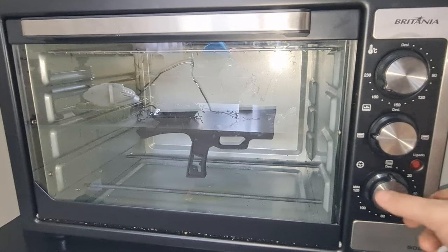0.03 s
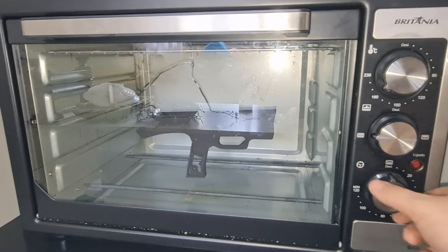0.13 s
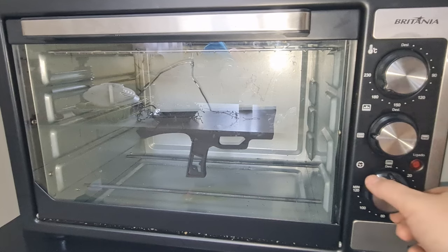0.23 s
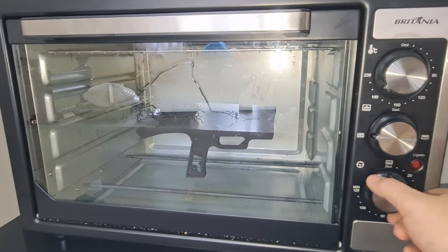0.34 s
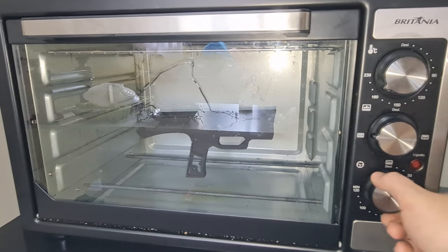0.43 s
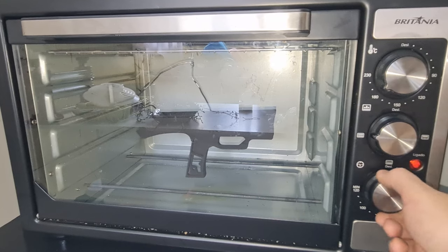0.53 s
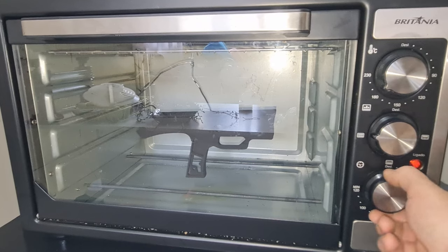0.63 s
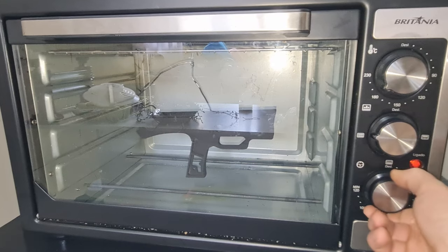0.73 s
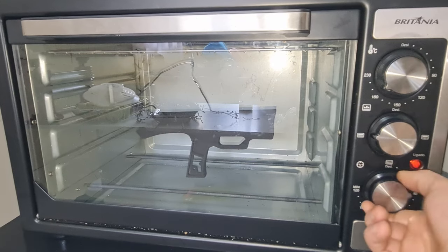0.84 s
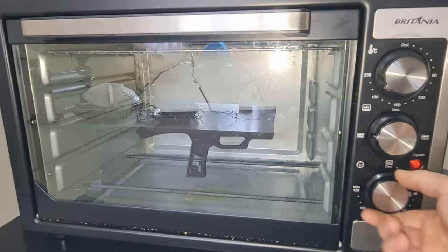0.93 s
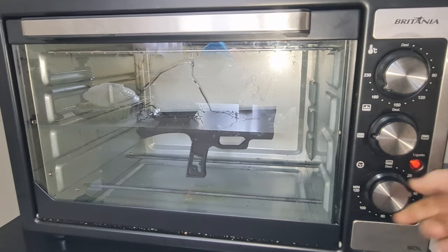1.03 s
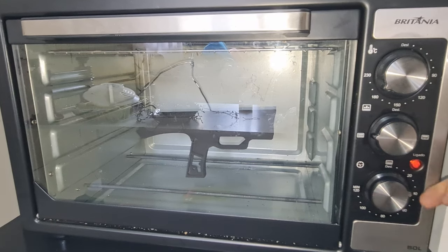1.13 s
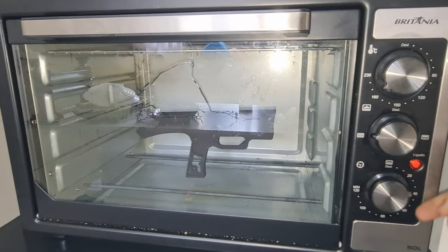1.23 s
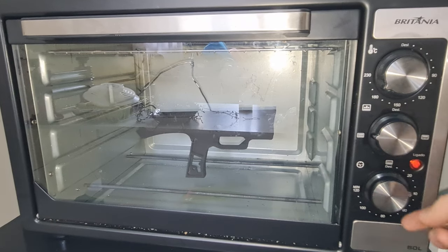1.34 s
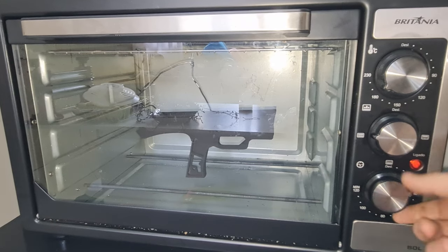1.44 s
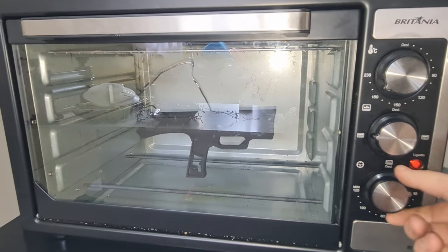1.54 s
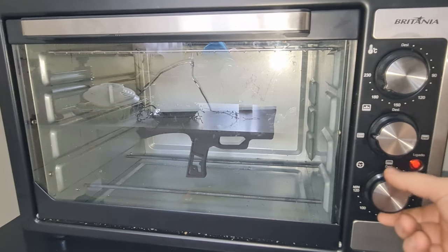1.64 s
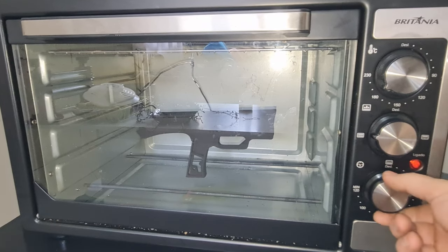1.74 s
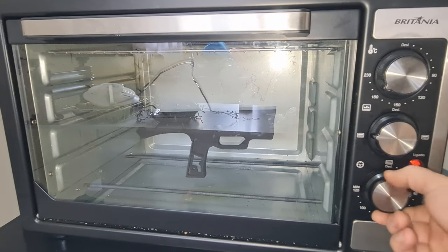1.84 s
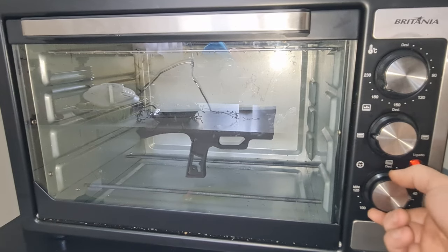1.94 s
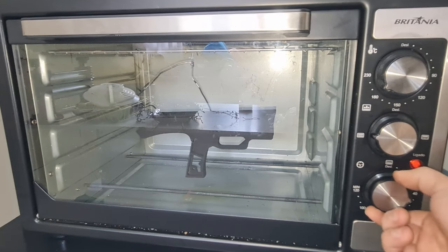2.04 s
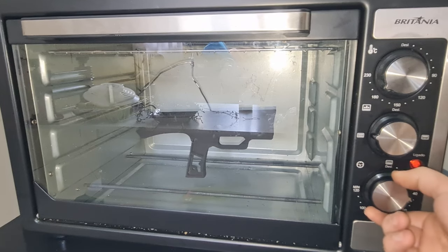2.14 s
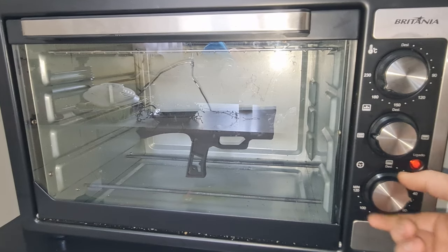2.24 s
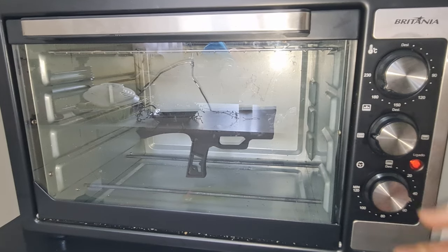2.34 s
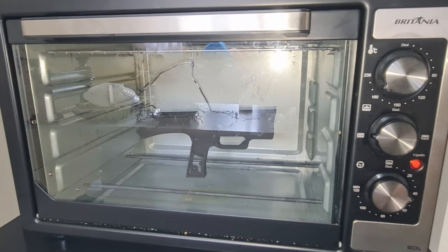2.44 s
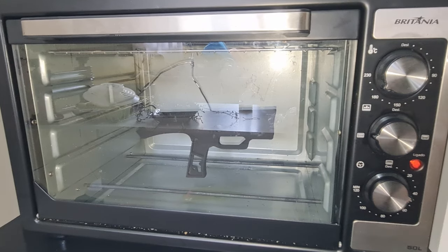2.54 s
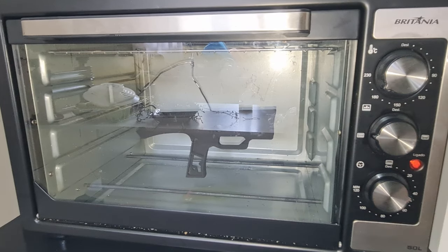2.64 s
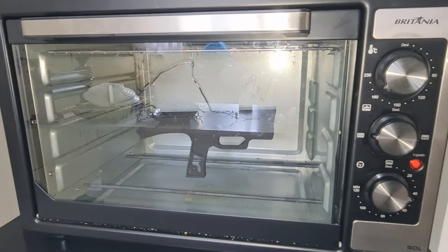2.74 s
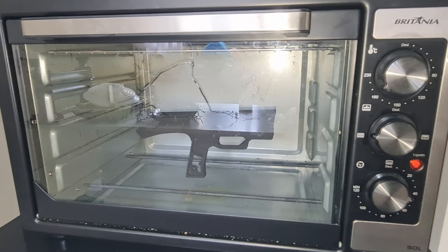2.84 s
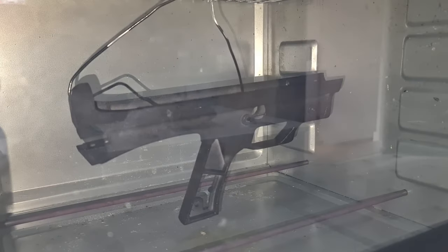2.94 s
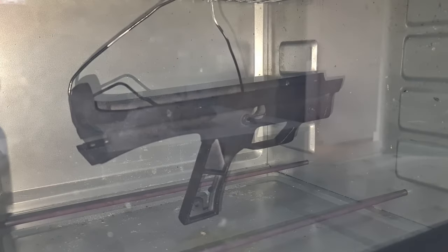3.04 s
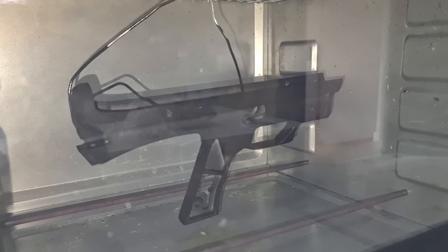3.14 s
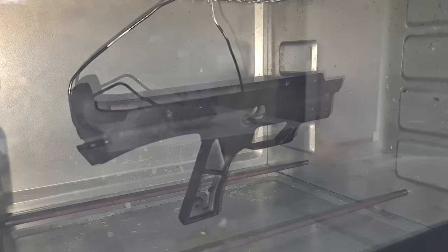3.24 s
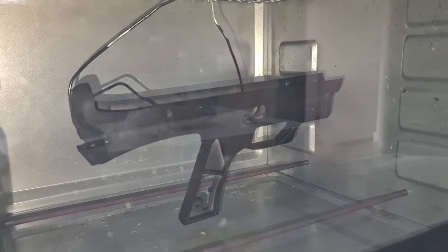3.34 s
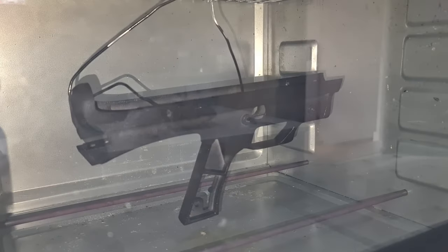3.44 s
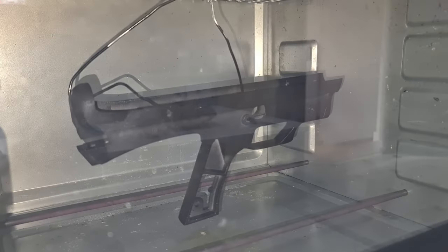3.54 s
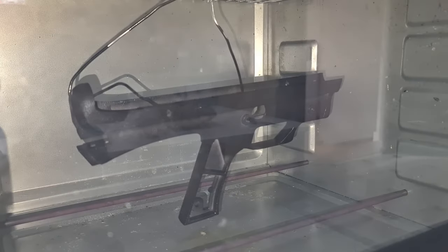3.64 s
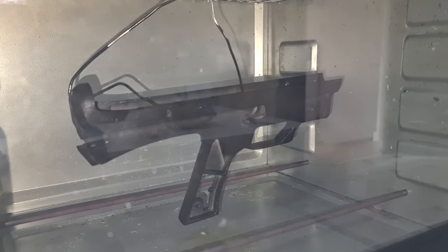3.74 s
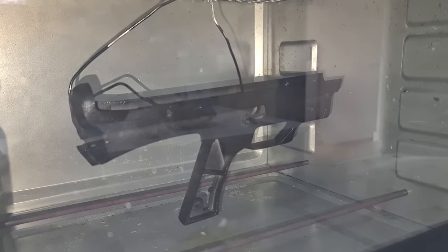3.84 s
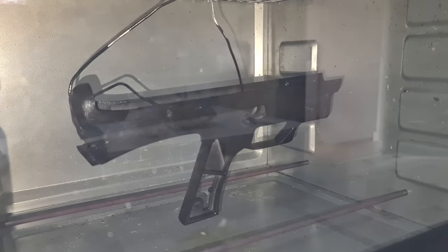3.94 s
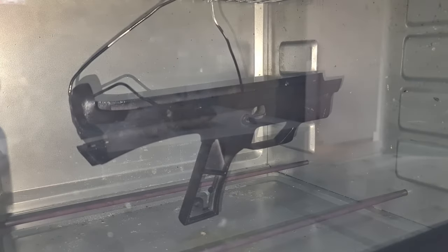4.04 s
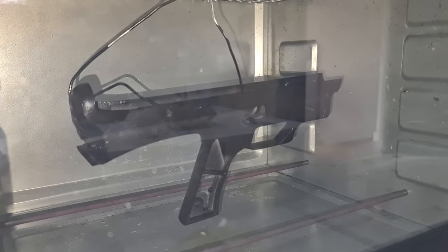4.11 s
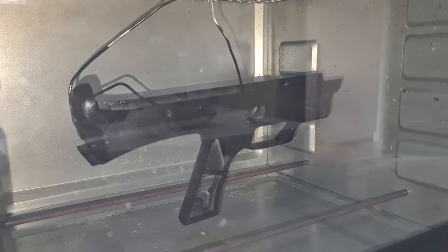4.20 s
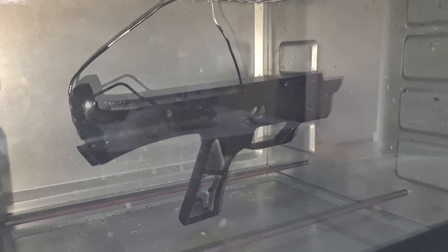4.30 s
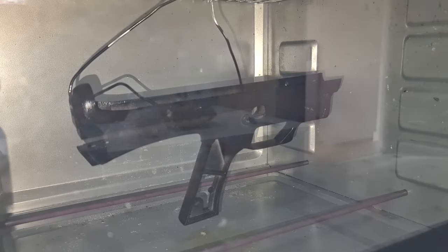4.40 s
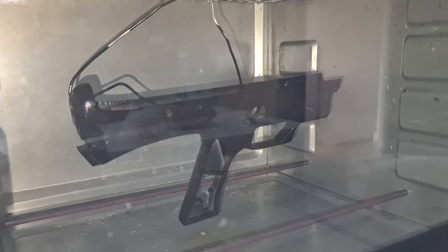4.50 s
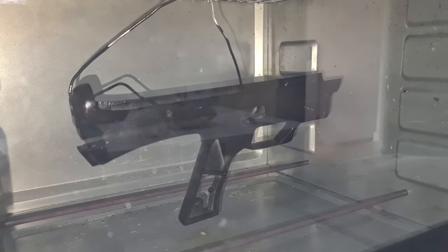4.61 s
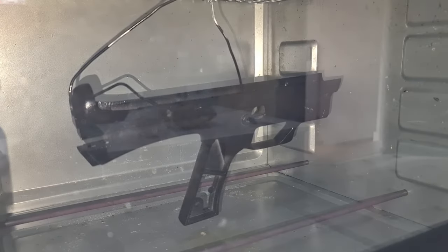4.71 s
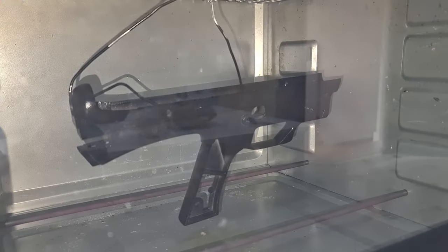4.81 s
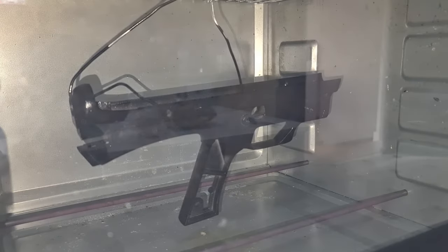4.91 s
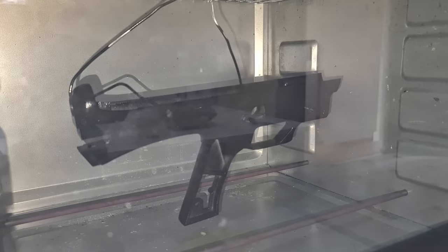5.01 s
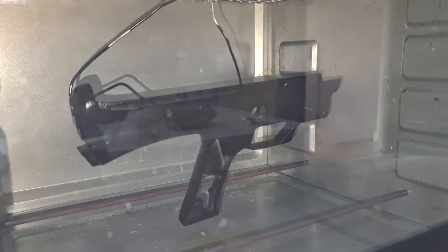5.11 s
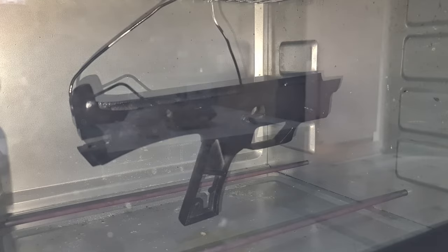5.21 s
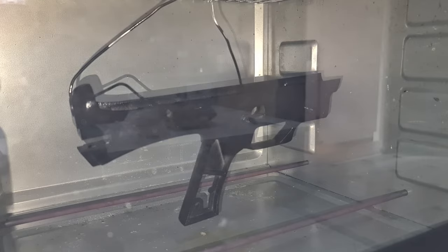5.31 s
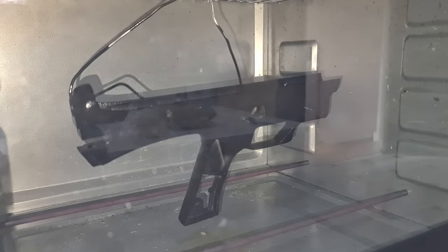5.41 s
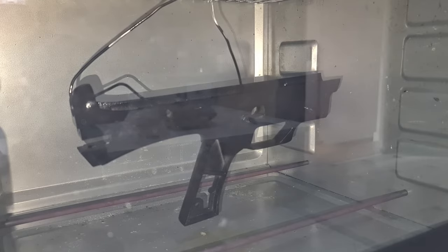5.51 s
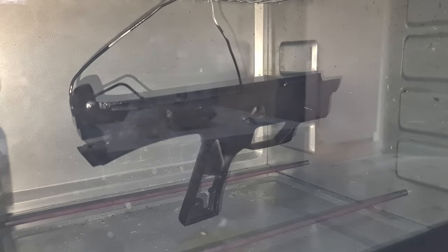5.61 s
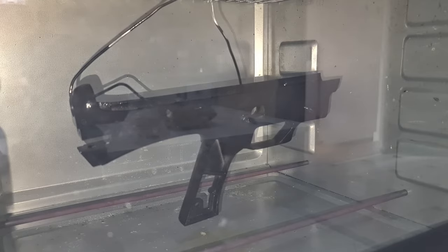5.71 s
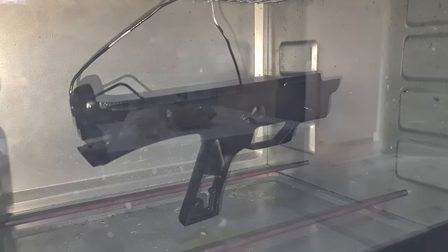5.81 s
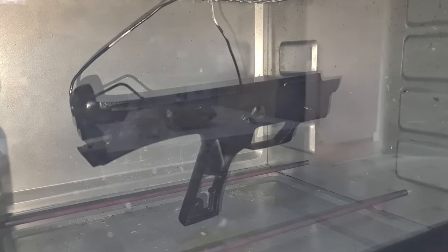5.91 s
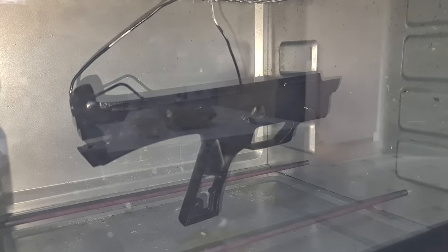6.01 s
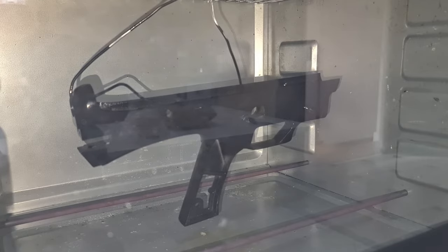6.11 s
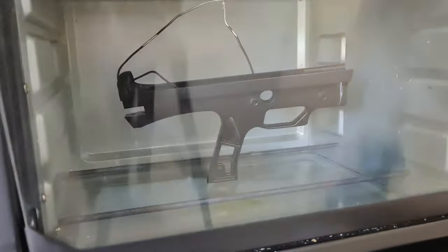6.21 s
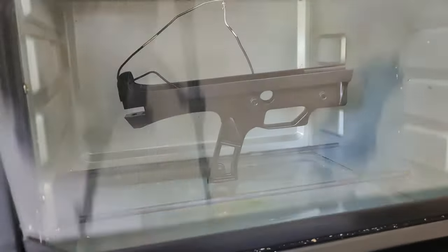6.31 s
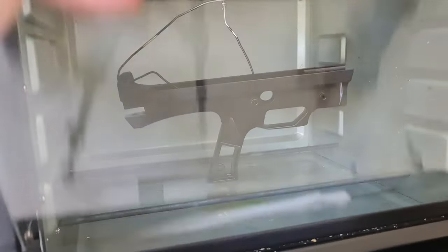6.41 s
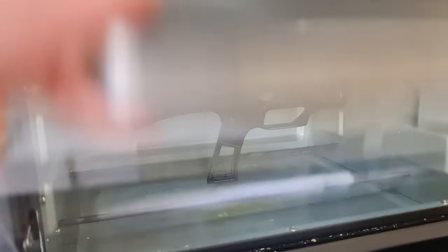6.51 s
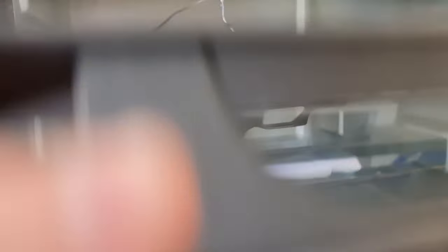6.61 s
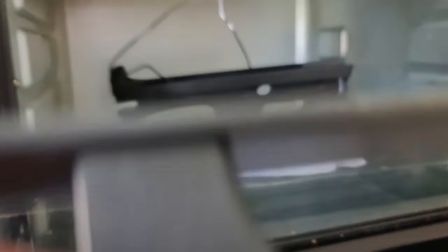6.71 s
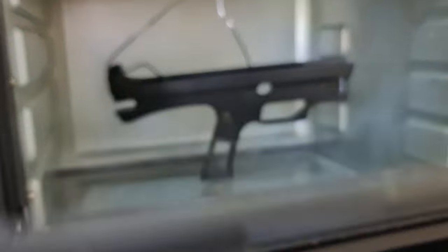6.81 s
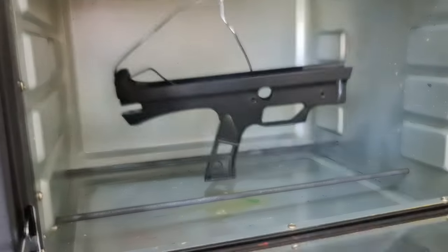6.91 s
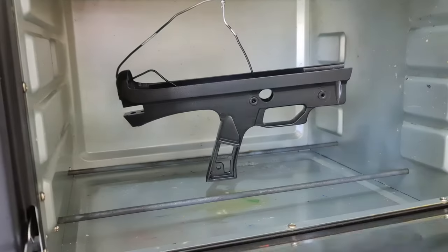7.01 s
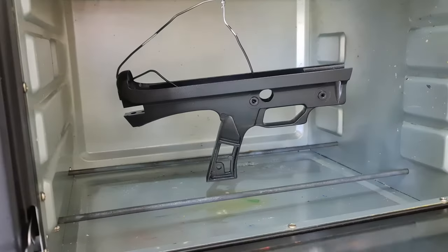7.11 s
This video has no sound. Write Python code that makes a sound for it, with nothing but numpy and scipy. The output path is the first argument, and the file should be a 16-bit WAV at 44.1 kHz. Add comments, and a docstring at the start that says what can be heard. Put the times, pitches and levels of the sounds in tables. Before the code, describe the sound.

A clockwork oven timer knob ratchets and clicks over a low drone, birds yelp outdoors, then a glass oven door squeals and knocks on its hinge.

```python
"""First a low wavering drone and rumble, with a bird yelping outdoors; both low sounds stop near 3 s.
In a small hard room an oven's clockwork timer knob is wound up and turned back: ticking gears, small clicks.
Two birds call on, in gliding harmonics and breath noise. Then a mains hum enters and the glass door swings on
its spring hinge: impulses knock, grains rattle and scrape, gliding tones squeal, and all ring glass and frame.
Still air and faint hiss, made of filtered noise, lie under everything."""
import sys
import numpy as np
from scipy import signal
from scipy.fft import rfft, irfft
from scipy.io import wavfile
from scipy.ndimage import uniform_filter1d

SR = 44100
rng = np.random.default_rng(int(sys.argv[2]) if len(sys.argv) > 2 else 0)


def log_audio(samples):
    """Write samples as a 16-bit WAV file to the path given in sys.argv[1]."""
    # one column per channel
    frames = np.atleast_2d(samples).T
    # limit to full scale, then quantise
    limited = np.clip(frames, -1, 1)
    pcm = np.round(limited * 32767).astype(np.int16)
    wavfile.write(sys.argv[1], SR, pcm)


N = 315315
TIME = np.arange(N) / SR
EDGE_HZ = 15750  # upper edge of the whole sound


def amp(db):
    """Decibels to gain."""
    return 10 ** (np.asarray(db) / 20)


def evened(x):
    """Scales to rms 1."""
    return x / np.sqrt(np.mean(x ** 2) + 1e-20)


def unit(x):
    """Scales each channel to energy 1."""
    return x / np.linalg.norm(x, axis=-1, keepdims=True)


def read(points, hz):
    """Reads a spectrum on a log-frequency axis."""
    f, value = np.transpose(points)
    return np.interp(np.log(hz + 1), np.log(f + 1), value)


def level(rows, axis=1):
    """A dB column as a gain over time, silent outside its span."""
    rows = np.array(rows)
    return amp(np.interp(TIME, rows[:, 0], rows[:, axis], left=-150, right=-150))


def ramp(start, rise_s):
    """Rises from 0 to 1 after start."""
    return np.clip((TIME - start) / rise_s, 0, 1)


def since(start):
    """Seconds gone by after start."""
    return np.maximum(TIME - start, 0)


def drift(cutoff_hz, size=N):
    """Smooth random wandering of rms 1: noise with its fast changes filtered off."""
    spectrum = rfft(rng.standard_normal(size))
    lowpass = 1 + (np.fft.rfftfreq(size, 1 / SR) / cutoff_hz) ** 4
    return evened(irfft(spectrum / lowpass, size))


def through(x, response):
    """Plays x through an impulse response."""
    return signal.oaconvolve(np.atleast_2d(x), np.atleast_2d(response), axes=1)[:, :N]


def colour(x, spectrum):
    """Causal (minimum-phase) filter with the given spectrum."""
    hz = abs(np.fft.fftfreq(4096, 1 / SR))
    log_gain = np.log(amp(np.maximum(read(spectrum, hz), -100)))
    response = np.fft.ifft(np.exp(np.conj(signal.hilbert(log_gain)))).real
    return through(x, response)


# How alike the two microphones hear diffuse sound.
# Each row: frequency in Hz, left-right likeness from -1 to 1.
LIKENESS = [(60, 0.91), (200, 0.81), (600, 0.63), (1300, 0.35), (3000, -0.14), (10000, 0.32)]


def diffuse(size):
    """Noise at two microphones: alike in the bass, largely unrelated in the treble."""
    a, b = rfft(rng.standard_normal((2, size)))
    alike = np.clip(read(LIKENESS, np.fft.rfftfreq(size, 1 / SR)), -1, 1)
    mid = a * np.sqrt((1 + alike) / 2)
    side = b * np.sqrt((1 - alike) / 2)
    return irfft(np.array([mid + side, mid - side]), size)


def burst(ring_s):
    """The dense, short ring of a small part, even in colour; ring_s sets how slowly it dies."""
    decay = amp(-60 * TIME[:4096] / ring_s)
    z = rfft(diffuse(size=4096) * decay)
    even = z / np.sqrt(uniform_filter1d(abs(z) ** 2, size=5) + 1e-12)
    return unit(irfft(even) * np.sqrt(decay))


def ringing(x, modes, ring_db):
    """Adds the ring of an object's modes, heard in another phase at each microphone."""
    t = TIME[:SR]
    ring = 0
    for hz, db, t60 in modes:
        phase = rng.uniform(-0.43, 1, (2, 1)) * min(hz / 700, np.pi)
        ring = ring + amp(db) * unit(amp(-60 * t / t60) * np.sin(2 * np.pi * hz * t + phase))
    return x + amp(ring_db) * through(x, unit(ring))


# How long the small hard room rings.
# Each row: frequency in Hz, t60 in seconds before any stretch.
ROOM_DECAY = [(100, 1), (500, 0.41), (2000, 0.5), (5000, 0.41), (10000, 0.38), (16000, 0.27)]


def room(x, wet_db, longer=1):
    """Adds a diffuse tail in which each band dies at its own speed; longer stretches it."""
    hz, t, z = signal.stft(diffuse(size=2 * SR), SR, nperseg=256)
    decay = amp(-60 * t / (longer * read(ROOM_DECAY, hz)[:, None]))
    tail = signal.istft(z * decay, SR, nperseg=256)[1]
    tail *= np.clip(TIME[:tail.shape[1]] / 0.0031, 0, 1)
    return (x + amp(wet_db) * through(x, unit(tail))) / np.sqrt(1 + amp(wet_db) ** 2)


def grains(per_s, spread_db):
    """A random train of tiny impacts of uneven size."""
    size = amp(spread_db * np.minimum(rng.exponential(1, N), 3)) * rng.choice([-1, 1], N)
    return evened(size * (rng.random(N) < per_s / SR))


def blows(rows, axis=1):
    """One impulse for each row of an event table."""
    rows, train = np.array(rows), np.zeros(N)
    train[np.round(rows[:, 0] * SR).astype(int)] = amp(rows[:, axis])
    return train


# The low drone's path. Each row: time in seconds, centre pitch in Hz, relative level in dB.
DRONE_PATH = [(0.0, 62.4, -52), (0.45, 62.75, -52), (0.54, 57.24, -69), (1.32, 73.4, -47.5),
              (1.77, 73.3, -47.5), (1.98, 57.46, -67), (2.16, 55.7, -61.5), (2.58, 71.1, -63),
              (2.76, 60.3, -70), (3.02, 56.6, -70)]
# Colour of the rumble. Each row: frequency in Hz, relative level in dB.
RUMBLE_COLOUR = [(15, -16), (35, -7), (55, 4.5), (85, -3.5), (130, -13), (230, -15), (275, -12.5),
                 (330, -21), (700, -30), (1500, -38), (4000, -40), (12000, -54), (14000, -92)]
# Mains hum. Each row: frequency in Hz, relative level in dB.
HUM_TONES = [(59.2, -48.5), (118.4, -57.5), (393, -67.5)]
# Colour of the still air. Each row: frequency in Hz, relative level in dB.
AIR_COLOUR = [(15, -3), (35, -0.5), (100, -2.5), (200, -13.5), (500, -19.5), (950, -24), (1450, -25),
              (1800, -30.5), (3000, -29.5), (9000, -48), (12000, -70)]
# Colour of the microphone hiss. Each row: frequency in Hz, relative level in dB.
HISS_COLOUR = [(3900, -28), (4550, -2), (5150, -5), (5600, 0), (5950, -24), (6650, -25), (7200, -10),
               (8100, -5), (8750, -12), (9400, -36), (11000, -65)]
DRONE_DB, RUMBLE_DB, RUMBLE_UNTIL_S = -0.5, -58, 3.03


def background(hum_from=6.19):
    """A wavering drone in low rumble, then mains hum; still air and thin microphone hiss throughout."""
    s, path_hz, _ = np.transpose(DRONE_PATH)
    drone_hz = np.interp(TIME, s, path_hz) * (1 + 0.009 * drift(9.3))
    phase = 2 * np.pi * np.cumsum(drone_hz) / SR
    drone = np.sqrt(2) * np.sin(phase) * level(DRONE_PATH, axis=2) * amp(DRONE_DB + 4.2 * drift(12))
    rumble = evened(colour(diffuse(N), RUMBLE_COLOUR)) * amp(RUMBLE_DB) * (1 - ramp(RUMBLE_UNTIL_S, .02))
    tones = sum(amp(db) * np.sin(2 * np.pi * hz * TIME) for hz, db in HUM_TONES)
    hum = np.sqrt(2) * tones * ramp(hum_from, 0.0041)
    air = amp(-69) * evened(colour(diffuse(N), AIR_COLOUR)) * amp(0.3 * drift(1.8))
    hiss = evened(colour(rng.standard_normal((2, N)), HISS_COLOUR)) * amp([[-73.3], [-69.3]])
    return (drone + rumble + hum) * amp([[.7], [-.7]]) + air + hiss  # left and right, dB


# Bird calls. Each row: start in seconds, length in seconds, top pitch in Hz before flutter, relative level in dB.
BIRD_CALLS = [(-.06, .13, 756, -56.5), (2.161, .38, 641.4, -60), (2.63, 0.19, 733, -67),
              (2.73, 0.25, 672, -58), (2.937, 0.34, 677, -58.5), (3.229, .26, 665, -58),
              (3.527, .26, 686.5, -58), (3.731, 0.26, 662, -58.5), (3.818, 0.11, 781, -55.5),
              (4.052, 0.27, 685.3, -57.5), (4.068, .115, 787, -56.5), (4.326, .11, 788.5, -55.5),
              (4.571, 0.27, 686.5, -57.5), (4.594, 0.1, 779, -55), (4.863, 0.13, 774, -56.5)]
# Resonances of the birds' throats. Each row: frequency in Hz, relative level in dB.
THROAT_COLOUR = [(450, -15.5), (700, -14.5), (900, -14), (1150, -0.5), (1450, 3), (1750, -6), (2100, -9),
                 (2700, -18.5), (3700, -10.5), (4600, -20), (6000, -13.5), (7500, -39)]
# Colour of the long outdoor echo. Each row: frequency in Hz, relative level in dB.
YARD_COLOUR = [(500, -21.5), (1100, 4), (1450, -0.5), (1900, -4), (3600, 7), (6000, -27)]
YELP_SAG = .305  # share of its pitch that a call loses
HOARSE_FROM_S, HOARSE_PER_S = 0.072, 3.01  # longer calls are hoarser
BEAK_SHUT, BEAK_OPEN_S = 0.85, 0.068  # the throat's upper resonances rise as the beak opens


def birds(rise_s=.052, scoop=0.36, fade_db=7, flutter=0.0214, rasp=0.6, shimmer_db=3, purity=0.41):
    """Each yelp scoops up to its top pitch and sags; long ones flutter and rasp, short ones near a whistle."""
    out, partials = np.zeros(N), np.arange(1, 10)[:, None]
    upper = partials > 2
    for start, length, top_hz, db in BIRD_CALLS:
        t = np.arange(0, length, 1 / SR)
        hoarse = np.clip(HOARSE_PER_S * (length - HOARSE_FROM_S), 0, 1)
        wobble = drift(129.0, size=10 * len(t)).reshape(10, -1)
        before = np.maximum(1 - t / rise_s, 0)
        after = np.maximum((t - rise_s) / (length - rise_s), 0)
        sag = after ** (1.5 if top_hz > 710 else .95)  # high, short calls arch; low, long ones slide
        glide_hz = top_hz * (1 - scoop * before ** 2 - YELP_SAG * sag)
        hz = glide_hz * (1 + flutter * (0.33 + hoarse) * wobble[0])
        phase = 2 * np.pi * np.cumsum(hz) / SR
        beak = np.interp(t, [0, BEAK_OPEN_S], [BEAK_SHUT, 1])
        throat_db = read(THROAT_COLOUR, partials * hz / np.where(upper, beak, 1))
        contrast = 1.225 + purity * (1 - hoarse)  # short calls get deeper formants
        partial_db = throat_db * contrast + shimmer_db * wobble[1:] * upper
        voice = evened((amp(partial_db + 8.2 * (partials == 1)) * np.sin(partials * phase)).sum(0))
        noise = evened(colour(rng.standard_normal(len(t)), THROAT_COLOUR)[0, :len(t)])
        swell = amp(db - 4.3 * before - fade_db * (after - 0.4372)) * signal.windows.tukey(len(t), .15)
        call = (voice + rasp * (0.22 + hoarse) * noise) * swell
        out += np.interp(TIME, start + t, call, left=0, right=0)
    outdoors = room(colour(out, YARD_COLOUR), wet_db=12, longer=3.77)
    return amp(-0.9) * room(out, wet_db=-3.5, longer=1.0) + amp(-11.0) * outdoors


GRIP_S, LET_GO_DB_PER_S, WRIST_ARCH_DB = .009, 330, 1.5
WHEEL_TURN_S, WHEEL_BIND_DB = .089, 1.5  # the gears bind a little once in each turn of a wheel


def turn(start, length, db, swell):
    """The effort of one twist of the wrist: a quick grip, a shallow arch with the wheel's ripple, a release."""
    along = ramp(start, length)
    arch_db = WRIST_ARCH_DB * (np.sin(np.pi * along) - .5) + swell * length * (along - .5)
    ripple_db = -WHEEL_BIND_DB * np.cos(2 * np.pi * along * length / WHEEL_TURN_S)
    release_db = -LET_GO_DB_PER_S * since(start + length)
    return ramp(start, GRIP_S) * amp(db + arch_db + ripple_db + release_db)


# Turns of the timer knob. Each row: start in seconds, length in seconds, relative level in dB, swell in dB per second.
KNOB_TURNS = [(.400, .432, -37.5, 8), (1.898, .183, -39.5, -12)]
# Colour of the clockwork. Each row: frequency in Hz, relative level in dB.
GEAR_COLOUR = [(100, -30), (200, -13.5), (380, -11.5), (560, -4.5), (720, -15), (1000, -4.5), (1350, -1.5),
               (1650, 1.5), (2200, -2.5), (3200, -0.5), (4300, -4), (6500, -7), (10500, -11.5),
               (13000, -8.5), (15800, -6.5)]
# Modes of the sheet-metal case, rung by gears and clicks.
# Each row: frequency in Hz, relative level in dB, t60 in seconds.
CASE_MODES = [(273.3, 0.5, 0.47), (437, -12.5, 0.15), (556, -4, 0.29), (842, 0, 0.29), (1325, -2.5, 0.06),
              (1680, -5, 0.068), (1856, -8, 0.5), (3125, -3, 0.038), (3600, -23, 0.054), (4305, 1, 0.022)]


def winding(teeth_per_s=225, tooth_share=0.21):
    """Gear teeth tick faster with a harder turn, over the fine rub of the spinning train."""
    effort = sum(turn(*row) for row in KNOB_TURNS) + 1e-8
    # teeth_per_s holds at the hardest effort, before the unsteadiness
    speed = teeth_per_s * (effort / effort.max()) ** .3 * (1 + .08 * drift(30))
    ticks = np.diff(np.floor(np.cumsum(speed) / SR), prepend=0)
    teeth = evened(ticks * amp(4.1 * drift(420)) / np.sqrt(speed))
    share = np.clip(tooth_share, 0, 1)
    drive = np.sqrt(share) * teeth + np.sqrt(1 - share) * grains(2200, spread_db=0.5)
    whirr = evened(colour(through(drive, burst(ring_s=0.013)), GEAR_COLOUR))
    cased = ringing(whirr * effort, CASE_MODES, ring_db=-13.0)
    return room(cased, wet_db=-5.0) * amp([[-.2], [.2]])


# Clicks of the knob. Each row: time in seconds, relative snap level in dB, relative thud level in dB.
KNOB_CLICKS = [(.877, -14, -23), (.90, -44, -19), (1.091, -30, -37.5), (1.309, -42.5, -46),
               (1.569, -30, -39.5), (2.075, -25, -30), (2.128, -17.5, -21.5), (2.291, -33.5, -55),
               (2.554, -29, -42), (2.743, -41, -43), (2.783, -32, -55), (5.334, -52.5, -58.5),
               (5.697, -45.5, -59)]
# Colour of the hard snap. Each row: frequency in Hz, relative level in dB.
SNAP_COLOUR = [(300, -40), (1500, -1.5), (2300, -6), (3300, -4), (4300, -3.5), (5500, -11.5), (8500, -8.5),
               (13000, -16), (16000, -22)]
# Colour of a dull blow, for the clicks and the door's knocks. Each row: frequency in Hz, relative level in dB.
THUD_COLOUR = [(25, -12), (60, -4), (110, -6), (250, -1), (450, -1.5), (700, 5), (1000, -9.5), (1400, -3),
               (2200, -19.5), (5000, -20), (15000, -62)]


def knob_clicks():
    """Each click is a hard snap and a duller thud into the case."""
    snap = through(blows(KNOB_CLICKS), unit(colour(burst(ring_s=0.056), SNAP_COLOUR)))
    thud = through(blows(KNOB_CLICKS, axis=2), unit(colour(burst(ring_s=0.095), THUD_COLOUR)))
    return amp(2) * room(ringing(snap + thud, CASE_MODES, ring_db=-10.0), wet_db=0.0)


# Squeaks of the hinge. Each row: start in seconds, length in seconds, first, middle and last pitch in Hz
# before jitter, relative level in dB, roughness from 0 to 1.
HINGE_SQUEAKS = [(6.251, 0.066, 858, 810.6, 787, -34.5, 0.44), (6.306, .082, 1344, 1423, 1483, -30.5, 0.67),
                 (6.434, .115, 1392, 1423, 1564, -35, 0.37), (6.53, .106, 2093, 2181, 2418, -32, 0.11),
                 (6.629, .066, 2748, 2675, 2615, -36, 0.23), (6.672, .09, 2345, 2380, 1788, -34.5, 0.21),
                 (6.765, 0.053, 1442, 1415, 1345, -40, 0.14)]
# Colour of the hinge's overtones. Each row: frequency in Hz, relative level in dB.
HINGE_COLOUR = [(800, 1), (1450, -3), (2200, -4.5), (2700, 8), (3400, 1.5), (4400, 2.5), (6300, -9.5),
                (8700, -10), (11000, -20.5), (13000, -14), (15500, -42)]
SQUEAK_EDGE_S = 0.009  # each squeak catches and lets go this fast


def squeal(chatter_db=5, jitter=0.041, rasp=0.63, slows_at=6.72, easing_db=7, slowing_db=4, surge_db=1):
    """The hinge sticks and slips in gliding squeaks; uneven slips smear its lines and break up its overtones."""
    out, partials = np.zeros(N), np.arange(1, 11)[:, None]
    for start, length, first_hz, middle_hz, last_hz, db, rough in HINGE_SQUEAKS:
        t = np.arange(0, length, 1 / SR)
        count = len(t)
        curve = np.polyfit([0, .5, 1], [first_hz, middle_hz, last_hz], 2)
        glide = np.polyval(curve, t / length)
        fast_slips = jitter * rough * drift(490, size=8192)[:count]
        slow_slips = 0.0142 * drift(70.6, size=8192)[:count]
        hz = glide * (1 + fast_slips + slow_slips)
        phase = 2 * np.pi * np.cumsum(hz) / SR
        chatter = np.array([drift(33, size=8192)[:count] for _ in partials])
        easing = np.clip((start + t - slows_at) / 0.041, 0, 1)  # the overtones fade as the door slows
        partial_db = read(HINGE_COLOUR, partials * hz) + chatter_db * chatter
        partial_db = partial_db - easing_db * easing * np.log2(partials)
        weights = amp(partial_db) * (partials * hz < EDGE_HZ)
        balanced = unit(weights.T).T  # constant energy across the partials at each moment
        grip = 1 + rasp * np.sqrt(abs(rough)) * drift(320, size=8192)[:count]
        squeak = evened(grip * (balanced * np.sin(partials * phase)).sum(0))
        edges = np.minimum(np.minimum(t, length - t) / SQUEAK_EDGE_S, 1)
        swell = amp(db - slowing_db * easing + surge_db * drift(30, size=8192)[:count]) * edges
        out += np.interp(TIME, start + t, squeak * swell, left=0, right=0)
    return through(out, burst(ring_s=0.013)) * amp(4.0)


# The swing scrapes harder up to its fastest moment, then coasts and comes to rest.
SWING_FROM_S, SWING_PEAK_S, SWING_REST_S = 6.252, 6.352, 6.70
SCRAPE_DB, SCRAPE_RISE_DB_PER_S, SCRAPE_FALL_DB_PER_S, BRAKE_DB_PER_S = -26.5, 215, 64, 200


def swing():
    """How hard the hinge scrapes: it speeds up, coasts and brakes."""
    early = np.maximum(SWING_PEAK_S - TIME, 0)
    coast_db = -SCRAPE_FALL_DB_PER_S * since(SWING_PEAK_S)
    brake_db = -BRAKE_DB_PER_S * since(SWING_REST_S)
    db = SCRAPE_DB - SCRAPE_RISE_DB_PER_S * early + coast_db + brake_db
    return ramp(SWING_FROM_S, 0.019) * amp(db)


# Knocks of the door, played by shaking() and door().
# Each row: time in seconds, relative thud level in dB, relative level in dB of the rattle it shakes loose.
DOOR_KNOCKS = [(6.194, -29, -49.5), (6.222, -20.5, -47), (6.255, -12, -41.5), (6.303, -2.5, -48),
               (6.328, 1, -45), (6.340, 1.5, -53), (6.347, 1, -53), (6.360, -2, -48), (6.415, -7, -36),
               (6.579, -18, -45), (7.048, -12, -42), (7.092, -17.5, -50)]
RATTLE_RISE_S, RATTLE_FALL_DB_PER_S, RATTLE_REST_DB = 0.0094, 62, -55.5


def shaking():
    """How hard the loose door rattles: each knock sets it off and it settles to a faint steady shake."""
    jolts = [ramp(s, RATTLE_RISE_S) * amp(db - RATTLE_FALL_DB_PER_S * since(s)) for s, _, db in DOOR_KNOCKS]
    rest = amp(RATTLE_REST_DB) * ramp(SWING_FROM_S, RATTLE_RISE_S)
    return np.linalg.norm(jolts + [rest], axis=0)


# Modes of the door's glass and frame. Each row: frequency in Hz, relative level in dB, t60 in seconds.
DOOR_MODES = [(190, -25, 1), (258, -10, .4), (392, 1.5, 0.44), (665, -5.5, 0.24), (1354, -4, 0.51),
              (1393, -19, 0.13), (2154, 2, 0.31), (2250, 5.5, 0.19), (2666, 2, 0.25), (2604, -1, 0.15),
              (2870, -28, 0.17), (3080, -1, 0.37), (3930, -11, 0.39), (4100, -15, 0.28), (4360, -3, 0.82),
              (4530, -9, 0.22)]
# Colour of the loose rattle. Each row: frequency in Hz, relative level in dB.
RATTLE_COLOUR = [(35, -14), (60, 2.5), (120, -0.5), (190, 5), (300, -5.5), (400, -2.5), (700, -6),
                 (1000, -14), (1500, -4.5), (2100, -26), (4000, -54)]
# Colour of the dry scrape. Each row: frequency in Hz, relative level in dB.
SCRAPE_COLOUR = [(590, -53), (1000, -6), (1460, -18), (2050, -13), (2890, -9.5), (3360, -6), (4380, -9.5),
                 (4810, -11), (10900, -18), (12500, -22.5), (15800, -28)]


def door(chafe_db=-21):
    """Knocks, a loose rattle, dry scraping and the squeal all ring the glass and frame."""
    shake = shaking()
    knocks = amp(-0.6) * through(blows(DOOR_KNOCKS), unit(colour(burst(ring_s=0.13), THUD_COLOUR)))
    loose = through(grains(500, spread_db=0), burst(ring_s=0.047))
    rattle = evened(colour(loose, RATTLE_COLOUR)) * shake
    rub = through(grains(2500, spread_db=0.0), burst(ring_s=0.013))
    scrape = evened(colour(rub, SCRAPE_COLOUR)) * (swing() + amp(chafe_db) * shake)  # the rattle chafes too
    rung = ringing(knocks + rattle + scrape + squeal(), DOOR_MODES, ring_db=-19.0)
    return room(rung, wet_db=-4) * amp([[1.2], [-1.2]])


def scene():
    """The background, birds, knob and door together."""
    return background() + birds() + winding() + knob_clicks() + door()


def record(dry):
    """The recorder's band limit: a steep low-pass at the upper edge."""
    lowpass = signal.firwin(511, EDGE_HZ, window=("kaiser", 9), fs=SR)
    return signal.oaconvolve(dry, lowpass[None], "same")


dry = scene()
out = record(dry)
log_audio(out)
```